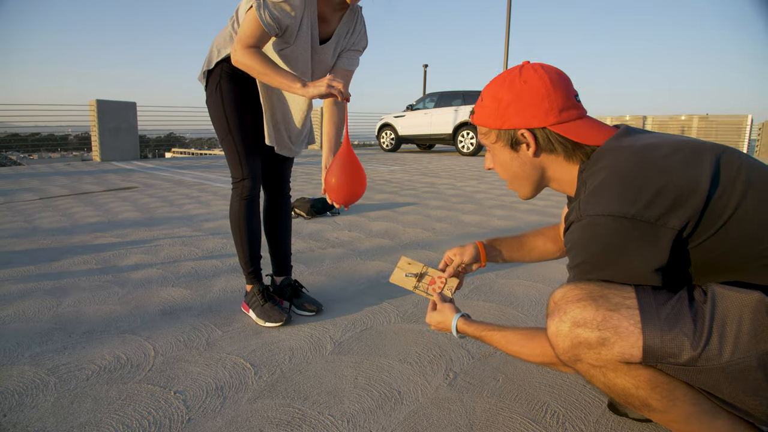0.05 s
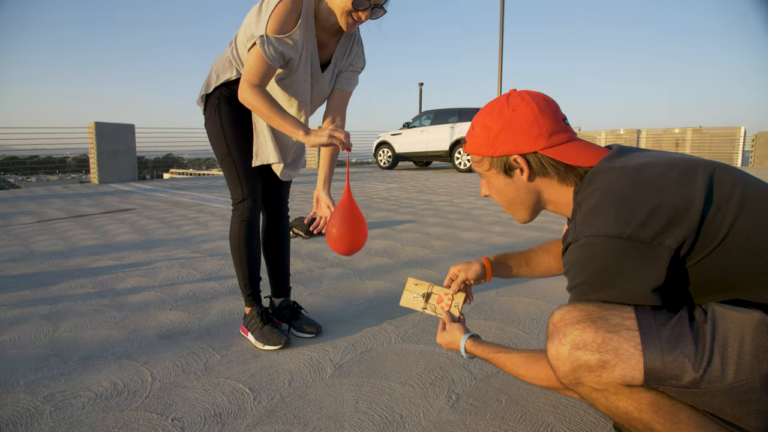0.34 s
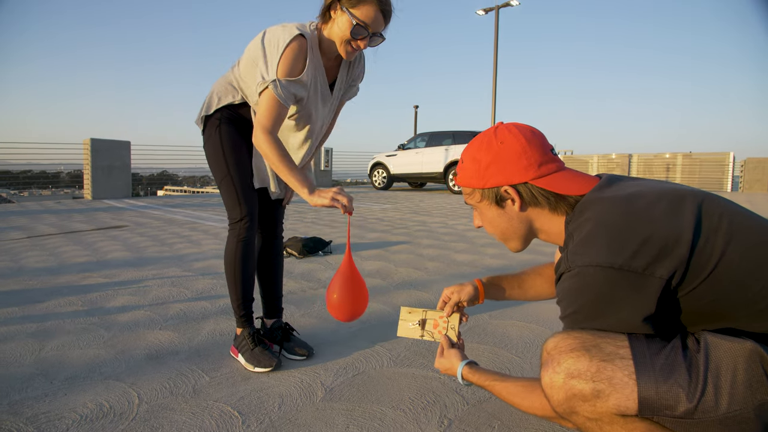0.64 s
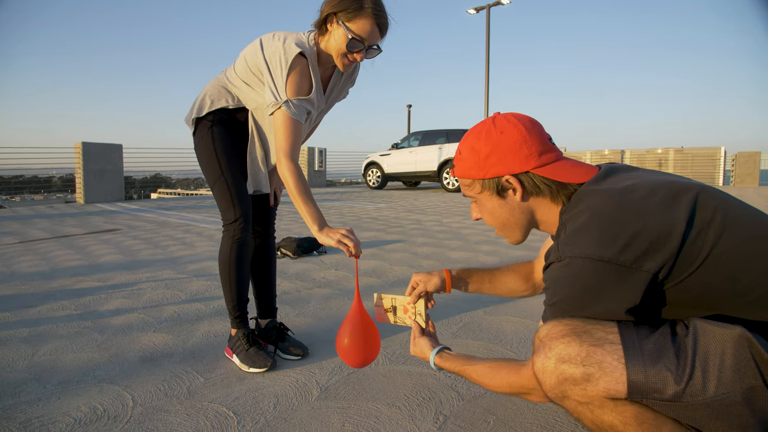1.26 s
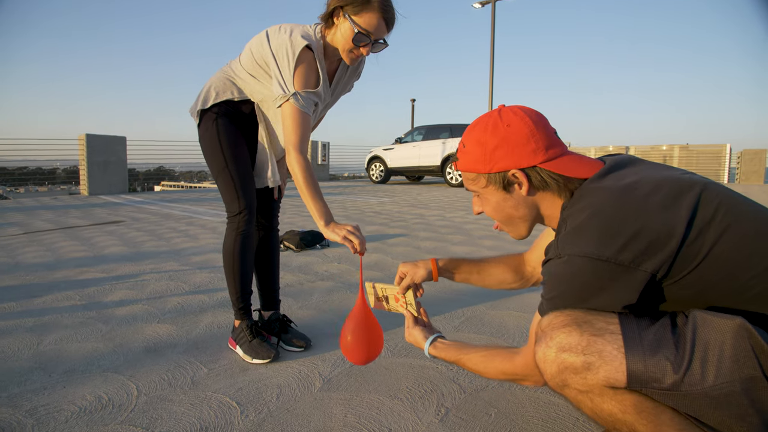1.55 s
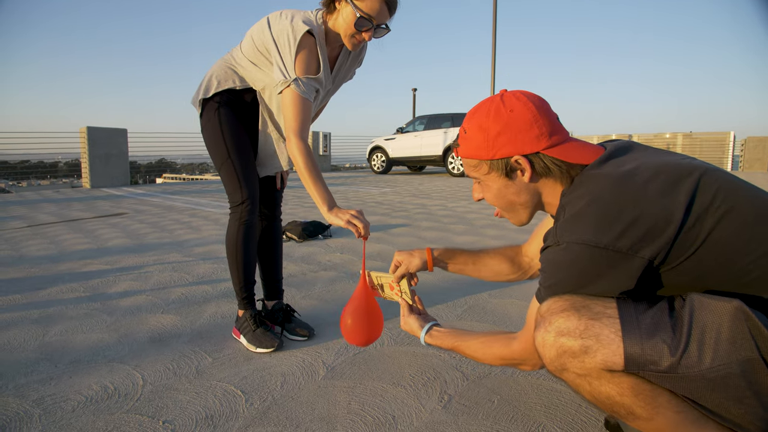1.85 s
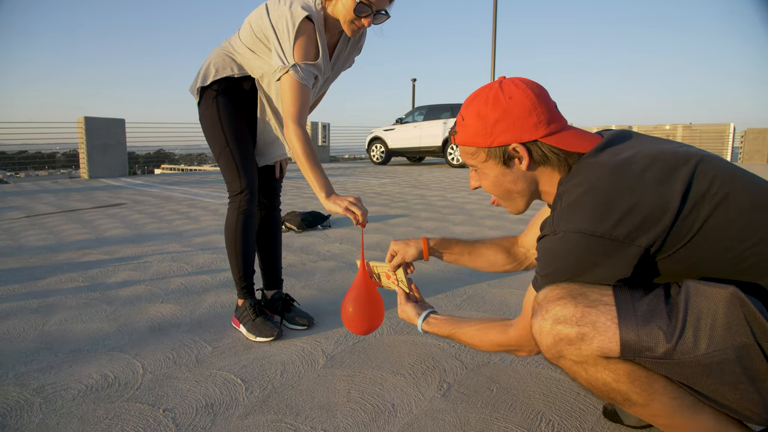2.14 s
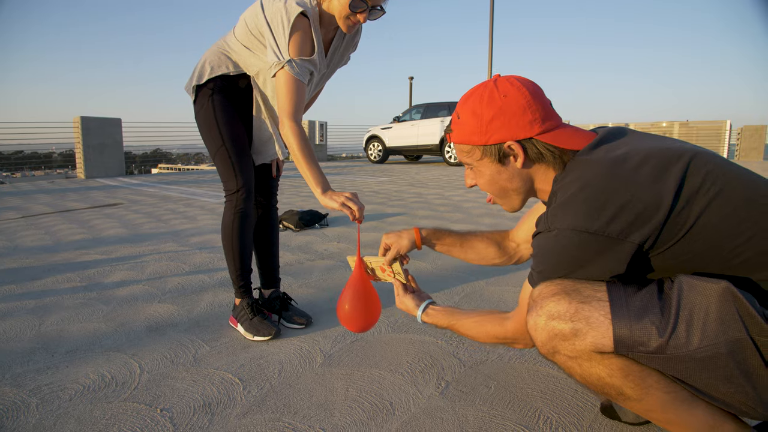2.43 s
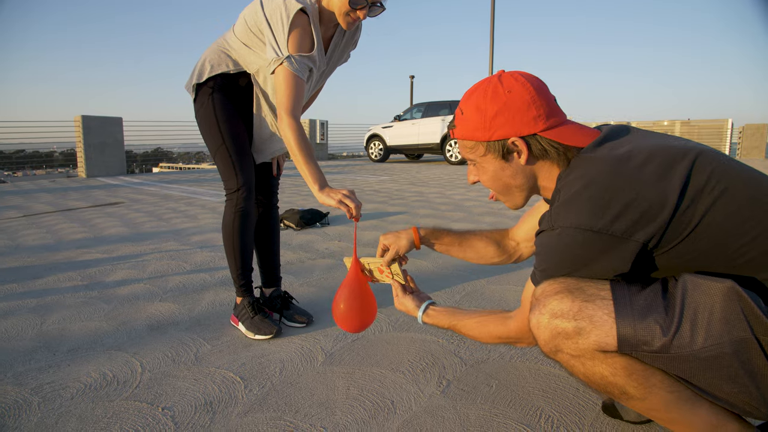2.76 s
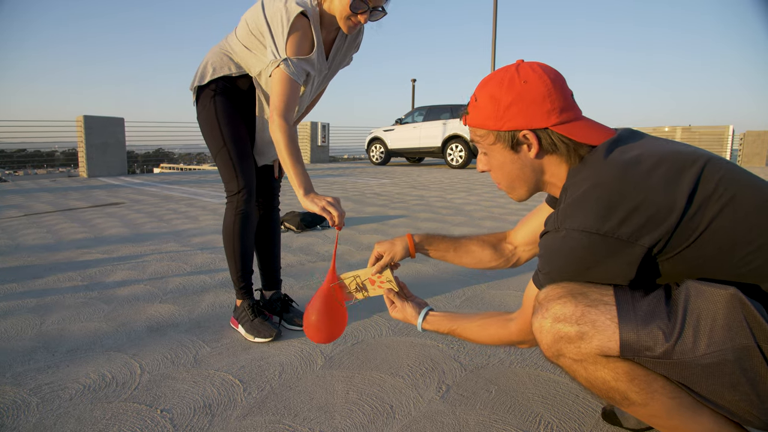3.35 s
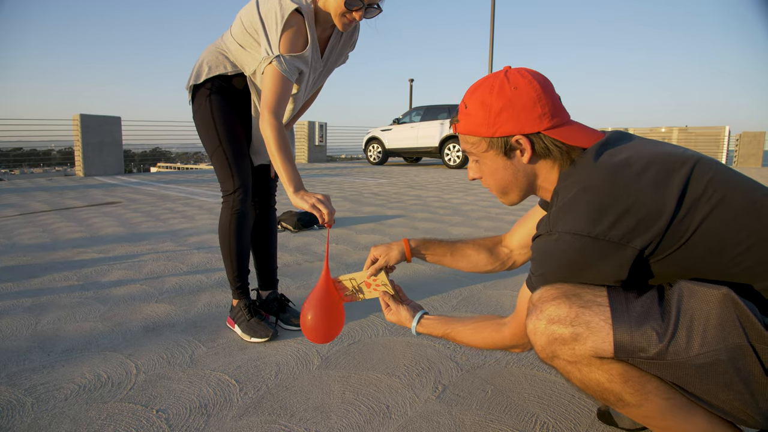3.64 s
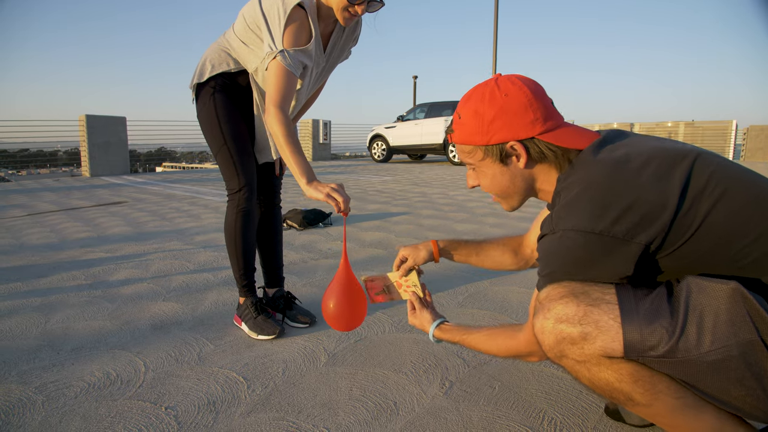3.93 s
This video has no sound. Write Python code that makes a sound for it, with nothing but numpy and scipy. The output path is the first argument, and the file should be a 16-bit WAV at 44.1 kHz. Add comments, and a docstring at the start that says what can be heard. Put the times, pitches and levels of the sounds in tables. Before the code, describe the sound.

Wooden mousetrap snapping shut with a sharp crack and wire rattle, distant traffic behind.

```python
"""A wooden mousetrap snaps shut on an open rooftop. Its metal trigger ticks, then the bar slams
onto the board with a crack and a short ring of the wood. The loose wires rattle and ring,
and one more sharp clack follows. Behind it are distant traffic, one soft gust of wind
on the microphone and a thin, steady trill."""
import sys
import numpy as np
from scipy import signal
from scipy.fft import rfft, irfft
from scipy.io import wavfile
from scipy.ndimage import uniform_filter1d

SR = 44100
rng = np.random.default_rng(int(sys.argv[2]) if len(sys.argv) > 2 else 0)


def wav_out(sig):
    """Save sig, one row per channel (or a flat mono array), as 16-bit PCM at SR to the path in sys.argv[1]."""
    wavfile.write(sys.argv[1], SR, np.round(np.clip(np.atleast_2d(sig).T, -1, 1) * 32767).astype(np.int16))


N = 176400
TIME = np.arange(N) / SR

# Levels in the tables are relative. A "colour" says how strong each frequency is.
# roar of distant traffic: f/Hz, level/dB
TRAFFIC_COLOUR = [(20, -24), (40, -10.5), (65, -8.5), (100, 0), (160, -5.5), (230, -7), (333, -12),
                  (465, -18), (600, -18.5), (760, -20), (1000, -20), (1400, -21.5), (2000, -29.5),
                  (3000, -36), (3650, -35.5), (3960, -33), (4430, -43), (5200, -46.5), (8300, -55),
                  (10500, -61), (15500, -67)]
# loudness of the traffic: t/s, level/dB
TRAFFIC_LOUDNESS = [(0, -32.5), (.06, -31), (.42, -27), (1.2, -27), (2, -28), (3, -27), (4, -28)]
# hum of far engines: f/Hz, level/dB
DRONE_COLOUR = [(30, -42), (75, -13), (88, 6), (97, 6.5), (110, 2.5), (135, -14.5), (400, -63)]
# tones of the trill: f/Hz, level/dB
TRILL_TONES = [(3846.4, -47), (3948.5, -53), (4050.4, -64.5), (4152.3, -74), (4652, -67), (4958, -68)]
# loudness of the trill: t/s, level/dB
TRILL_LOUDNESS = [(0, -5.5), (.35, 0), (.8, -0.5), (1.25, 3), (1.8, 0.5), (2.4, -2), (3, -0.5), (4, 0)]
# fingers shifting on the trap: f/Hz, level/dB
FINGER_COLOUR = [(1000, -30), (3000, -10), (6000, 0), (8500, 4), (10500, -15), (16000, -18)]
# light ticks of trigger and spring: t/s, level/dB, brightness/(dB per octave)
TRIGGER_TICKS = [(.718, -43, 6), (2.0952, -24, 0), (2.1075, -31, 3), (2.115, -36, 2), (2.1205, -36, 2),
                 (2.1285, -45, 4), (2.182, -37, 3), (2.186, -33.5, 5), (2.1955, -34, 2), (2.4923, -29, -6),
                 (2.5936, -36, 3), (2.9802, -29, -3), (3.4198, -25, 0.5), (3.428, -32.5, -3),
                 (3.5615, -46, 8), (3.5745, -44, 3), (3.6308, -36.5, 4.5), (3.8184, -36, 4.5),
                 (3.842, -41, 2)]
# the small metal trigger: f/Hz, level/dB
TRIGGER_COLOUR = [(200, -14), (1200, -18), (1800, 15), (2400, -8.5), (3300, 3), (4900, -21), (6300, -3),
                  (7100, -29), (8100, -10), (9100, -30), (11500, -19.5), (12700, -25), (16000, -35)]
# natural tones of the steel wire: f/Hz, level/dB, base ring time/s
WIRE_TONES = [(3542, 0, .3), (6350, -9, .12), (8086, -10, .14), (9943, 0, .2), (11890, -10, .13),
              (13920, -2, .13), (15570, -11, .12)]
# knocks that set the wire ringing: t/s, level/dB, favoured f/Hz, ring time factor
WIRE_KNOCKS = [(2.0952, -44, 12300, 1.1), (2.186, -58, 10000, .9), (2.198, -50, 14000, .25),
               (3.105, -45, 15000, 1), (3.128, -38, 15500, 1), (3.16, -24.5, 3542, 0.85),
               (3.174, -27, 12300, 0.52), (3.189, -30.5, 9800, 1.2), (3.21, -38, 14000, 1),
               (3.225, -34, 10000, 1.6), (3.25, -32, 14300, 0.74), (3.27, -37, 10200, 1.1),
               (3.302, -34, 13500, 0.55), (3.318, -33, 9900, 0.6), (3.347, -37, 14500, 0.36),
               (3.421, -47, 10300, 1.4), (3.542, -39, 10200, 1.16), (3.631, -60, 11600, .5),
               (3.819, -61, 11500, .6)]
# wind on the microphone: f/Hz, level/dB
WIND_COLOUR = [(20, -16), (50, -19.5), (85, 4.5), (115, -7.5), (170, -8), (400, -32), (2000, -80)]
# loudness of the gust: t/s, level/dB
GUST_LOUDNESS = [(2.1, -47), (2.17, -22), (2.23, -23), (2.28, -34), (2.34, -15.5), (2.42, -29), (2.52, -26),
                 (2.65, -44)]
# the bar hits the board: t/s, level/dB, favoured f/Hz, ring time factor, crack level/dB
BAR_BLOWS = [(3.0280, 2, 2100, 0.82, -30), (3.0292, 7.5, 3840, 0.51, -25.5), (3.0332, 4, 2240, 0.72, -20),
             (3.0418, -4.5, 3500, 0.54, -23), (3.05, -12, 2896, .7, -12), (3.1596, -5.5, 1770, 0.61, -21),
             (3.5413, 0.5, 2100, 0.22, -7.5), (3.5429, -0.5, 2130, 0.78, -8),
             (3.5486, -21, 3200, 0.79, -12)]
# natural tones of the board: f/Hz, level/dB, base ring time/s
BOARD_TONES = [(920, -15, 0.056), (1335, -7.5, 0.054), (1633, -7.5, 0.046), (2017, -1, 0.018),
               (2290, -2.5, 0.015), (2670, -4.5, 0.016), (3070, -5, 0.038), (3470, -1.5, 0.023),
               (3790, -6, .035), (4364, -1.5, 0.021), (6400, -26, 0.025), (8750, -19, 0.012)]
# crack of a hard blow: f/Hz, level/dB
CRACK_COLOUR = [(200, -11), (500, -15), (850, 8), (1200, -4), (2000, 3.5), (3500, -5), (5200, -2),
                (6800, -9.5), (8500, -10.5), (11500, -30), (16000, -20)]
# loudness of the chattering spring: t/s, level/dB
CHATTER_LOUDNESS = [(3.029, -60), (3.038, -20), (3.07, -36), (3.12, -30.5), (3.18, -31), (3.24, -35.5),
                    (3.31, -43), (3.35, -46), (3.38, -70)]
# a knock of wire or spring: f/Hz, level/dB
KNOCK_COLOUR = [(200, -27), (600, -25), (1150, 2.5), (1400, -22), (1750, 9.5), (2300, -10), (2800, -3),
                (3400, -2.5), (4900, -18.5), (6400, -16), (7300, -15.5), (8200, -17), (9300, -23),
                (11500, -23.5), (12700, -27), (16000, -34)]
# loose wires hit the board: t/s, level/dB, brightness/(dB per octave)
RATTLE_KNOCKS = [(3.0365, -16, 3), (3.0455, -27, 9), (3.0652, -24, 1), (3.0803, -20, 4), (3.087, -38, -4),
                 (3.1012, -23, 1), (3.1125, -26, -1), (3.1276, -19.5, 1), (3.1325, -27, 2),
                 (3.1455, -25, 0), (3.152, -30, 12), (3.1612, -21.5, 4), (3.1675, -19.5, 6),
                 (3.1755, -23, 3.5), (3.2075, -18, 1), (3.2105, -20, 4.5), (3.2155, -29, 5),
                 (3.222, -21, 3.5), (3.2298, -17.5, -1.5), (3.2465, -21, -3), (3.2545, -26, 1),
                 (3.268, -27, -7), (3.2745, -37, 6), (3.286, -25, 3), (3.2935, -26, 2.5), (3.2995, -29, 4),
                 (3.3105, -23, 0.5), (3.3445, -29, 4)]


def amp(db):
    """Turns decibels into a gain."""
    return 10 ** (np.asarray(db) / 20)


def unit(x):
    """Scales a signal to an average strength (rms) of 1."""
    return x / np.sqrt(np.mean(x ** 2) + 1e-20)


def level(points):
    """Gain over time from points of t/s, level/dB."""
    return amp(np.interp(TIME, *np.transpose(points)))


def shape(points, hz):
    """Gain over frequency from points of f/Hz, level/dB."""
    f, db = np.transpose(points)
    return amp(np.interp(np.log(hz + 1), np.log(f), db))


def add(mix, s, sound):
    """Mixes a sound in, starting at s seconds."""
    part = mix[round(s * SR):][:len(sound)]
    part += sound[:len(part)]


def fade(t, t60):
    """Dies away by 60 dB in t60 seconds, the ring time."""
    return np.exp(-np.log(1000) * t / t60)


def coloured(x, colour, tilt_db=0):
    """Gives x a colour; a positive tilt (dB per octave) makes it brighter."""
    hz = np.fft.rfftfreq(len(x), 1 / SR)
    octaves = np.log2(np.maximum(hz, 500) / 3000)
    return unit(irfft(rfft(x) * shape(colour, hz) * amp(tilt_db * octaves), len(x)))


def burst(colour, t60, tilt_db=0):
    """A sudden puff of noise that dies quickly."""
    t = TIME[:SR // 10]
    return coloured(rng.choice([-1., 1.], len(t)), colour, tilt_db) * fade(t, t60)


def knock(colour, t60, tilt_db=0):
    """One small knock; each spot that is struck has a slightly different colour."""
    hz = np.arange(200, 16001, 310)
    db = 20 * np.log10(shape(colour, hz)) + rng.normal(0, 4, len(hz))
    return burst(np.transpose([hz, db]), t60, tilt_db)


def focus(hz, favoured_hz, floor_db, width_octaves=0.3):
    """How strongly a hit wakes a tone: most near the pitch it favours."""
    return amp(floor_db) + np.exp(-.5 * (np.log2(hz / favoured_hz) / width_octaves) ** 2)


def traffic():
    """Far traffic roars: noise, built in short frames, that drifts in colour and swells slightly."""
    frames, hz = N // 512 + 5, np.fft.rfftfreq(2048, 1 / SR)
    real, imag, patches = rng.standard_normal((3, frames, len(hz)))
    patches = uniform_filter1d(patches, size=8, axis=0)  # smooth over time
    patch_db = unit(uniform_filter1d(patches, size=16, axis=1))  # and over frequency
    swell_db = 1.06 * unit(uniform_filter1d(rng.standard_normal(frames), size=30))[:, None]
    spectrum = (real + 1j * imag) * shape(TRAFFIC_COLOUR, hz) * amp(patch_db + swell_db)
    roar = signal.istft(spectrum.T, nperseg=2048, noverlap=1536)[1][:N]
    return unit(roar) * level(TRAFFIC_LOUDNESS)


def drone():
    """Far engines make a low, unsteady hum."""
    return amp(-37) * coloured(rng.standard_normal(N), DRONE_COLOUR)


def trill():
    """A thin whine, perhaps an insect: close tones beat about a hundred times a second."""
    slow_noise = coloured(rng.standard_normal(N), [(2, 0), (10, -12), (60, -60), (600, -120)])
    drift = 0.55 * 2 * np.pi * np.cumsum(slow_noise) / SR  # the pitch wanders a little
    whine = sum(amp(db) * np.sqrt(2) * np.cos(2 * np.pi * hz * TIME + drift) for hz, db in TRILL_TONES)
    return whine * level(TRILL_LOUDNESS)


def fingers(ticks_per_s=33):
    """Fingers shifting on the trap make faint, irregular ticks."""
    out = np.zeros(N)
    for when, chance in rng.random((round(ticks_per_s * N / SR), 2)):
        db = -61 - np.log(max(chance, .05))
        add(out, when * TIME[-1], amp(db) * burst(FINGER_COLOUR, t60=0.027))
    return out


def trigger():
    """The metal trigger and the spring tick lightly."""
    out = np.zeros(N)
    for s, db, tilt_db in TRIGGER_TICKS:
        add(out, s, amp(db) * knock(TRIGGER_COLOUR, t60=0.02, tilt_db=tilt_db))
    return out


def wire_ring(rise_s=.002, wobble_depth=.27, wobble_hz=70):
    """Each knock feeds energy into the wire's thin, high tones, which wobble as it shakes."""
    out, t = np.zeros(N), TIME[:SR // 2]
    smooth = signal.butter(2, wobble_hz, fs=SR)
    for hz, tone_db, t60 in WIRE_TONES:
        energy = np.zeros(N)
        for s, db, favoured_hz, length in WIRE_KNOCKS:
            strength = amp(db + tone_db) * focus(hz, favoured_hz, floor_db=-25)
            ring = (1 - np.exp(-t / rise_s)) * fade(t, t60 * length)
            add(energy, s, (strength * ring) ** 2)
        shake = unit(signal.lfilter(*smooth, rng.standard_normal((2, N))))
        gain_wobble, phase_wobble = wobble_depth * shake
        out += np.sqrt(energy) * (1 + gain_wobble) * np.sin(2 * np.pi * hz * TIME + phase_wobble)
    return out


def wind():
    """One soft gust rumbles on the microphone."""
    return coloured(rng.standard_normal(N), WIND_COLOUR) * level(GUST_LOUDNESS)


def bar_snap(bass_cut_hz=770):
    """The bar strikes the board: a crack and the short ring of the wood."""
    out, t = np.zeros(N), TIME[:SR // 10]
    bass_cut = signal.butter(2, bass_cut_hz, "high", fs=SR)  # a small board gives off little bass
    for s, db, favoured_hz, length, crack_db in BAR_BLOWS:
        wood = np.zeros(len(t))
        for hz, tone_db, t60 in BOARD_TONES:
            strength = amp(tone_db) * focus(hz, favoured_hz, floor_db=-11) * rng.choice([-1, 1])
            wood += strength * fade(t, t60 * length) * np.sin(2 * np.pi * hz * t)
        wood = amp(-7) * signal.lfilter(*bass_cut, wood)
        crack = amp(crack_db) * burst(CRACK_COLOUR, t60=.017)
        add(out, s, amp(db) * (wood + crack))
    return out


def spring_chatter(knocks_per_s=550):
    """The shaking spring makes a dense run of tiny knocks."""
    out, start = np.zeros(N), CHATTER_LOUDNESS[0][0]
    span = CHATTER_LOUDNESS[-1][0] - start
    for when, chance in rng.random((round(knocks_per_s * span), 2)):
        db = -3.5 * np.log(max(chance, .08))  # many weak knocks, a few strong ones
        add(out, start + when * span, amp(db) * knock(KNOCK_COLOUR, t60=.02))
    return unit(out) * np.sqrt(span / TIME[-1]) * level(CHATTER_LOUDNESS)


def wire_rattle():
    """The loose wires knock on the board after the snap."""
    out = np.zeros(N)
    for s, db, tilt_db in RATTLE_KNOCKS:
        add(out, s, amp(db) * knock(KNOCK_COLOUR, t60=0.026, tilt_db=tilt_db))
    return out


def rooftop(x, treble_cut_hz=5000):
    """Adds the weak, dull echo from the roof and its low walls."""
    t = TIME[:SR // 2]
    dull_noise = signal.lfilter(*signal.butter(1, treble_cut_hz, fs=SR), rng.standard_normal(len(t)))
    echo = dull_noise * fade(t, t60=0.24) * (t > .005)
    return x + amp(-33) * signal.fftconvolve(x, echo / np.linalg.norm(echo))[:N]


def scene():
    """The trap close by, over the outdoor background, in one channel."""
    background = traffic() + drone() + trill() + wind()
    trap = fingers() + trigger() + wire_ring() + bar_snap() + spring_chatter() + wire_rattle()
    return (rooftop(trap) + background)[None]


def record(dry, top_hz=15800):
    """The snap overloads the recorder, and the highest treble is cut off."""
    clipped = np.clip(dry, -1, 1)
    treble_cut = signal.firwin(301, top_hz, window=("kaiser", 8), fs=SR)
    return signal.oaconvolve(clipped, treble_cut[None], "same")


dry = scene()
out = record(dry)
wav_out(out)
```